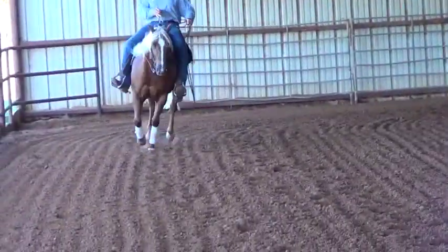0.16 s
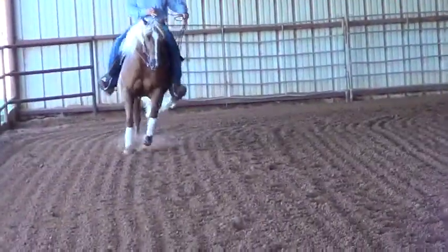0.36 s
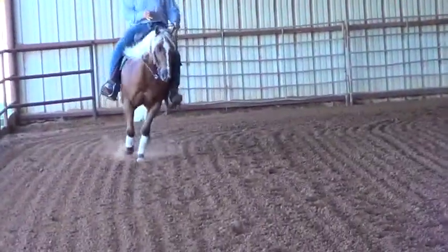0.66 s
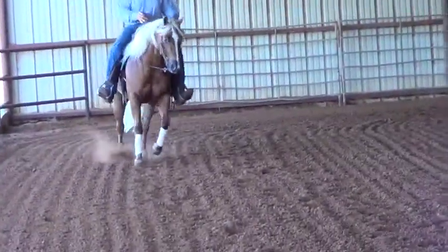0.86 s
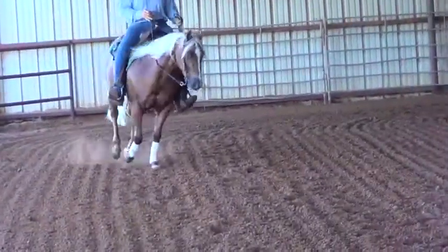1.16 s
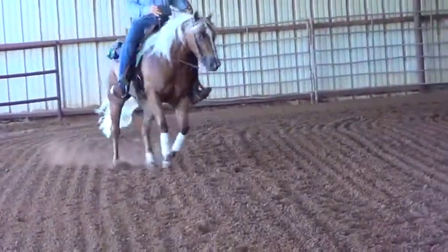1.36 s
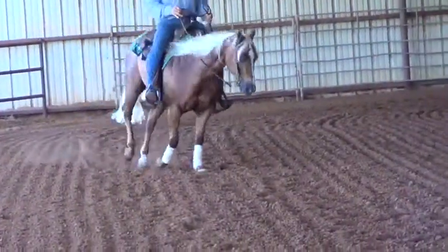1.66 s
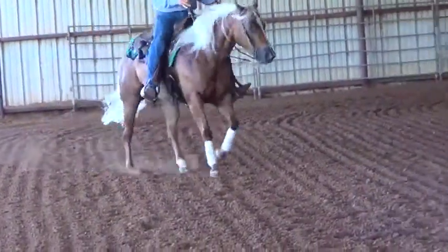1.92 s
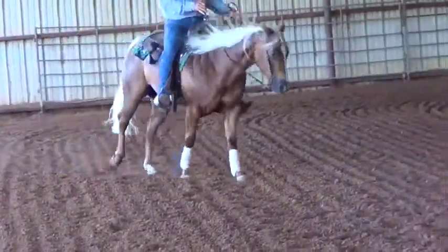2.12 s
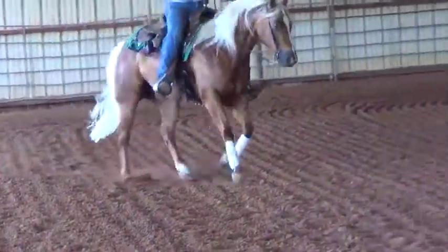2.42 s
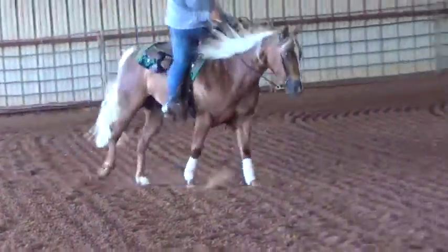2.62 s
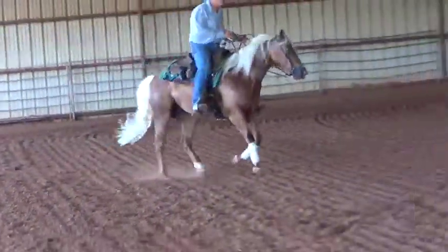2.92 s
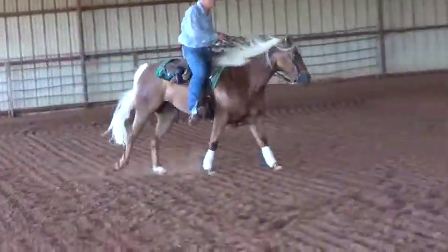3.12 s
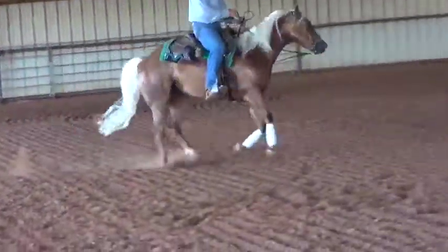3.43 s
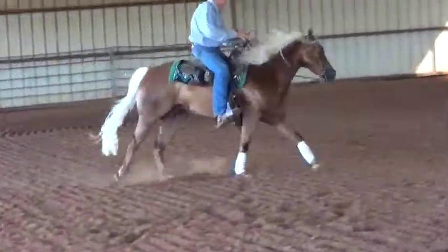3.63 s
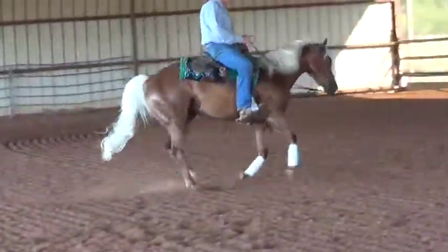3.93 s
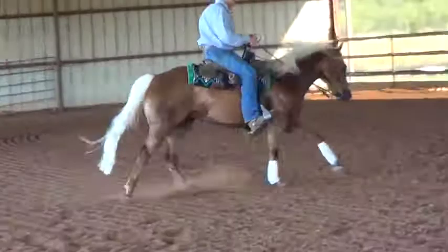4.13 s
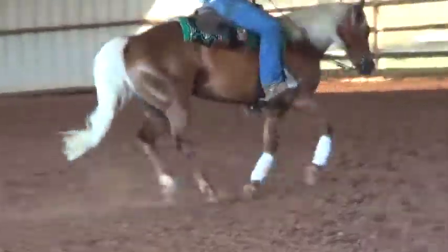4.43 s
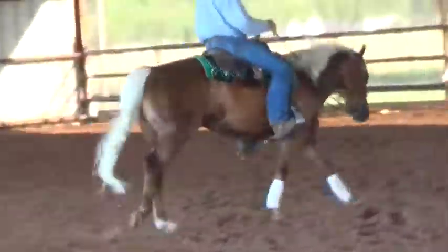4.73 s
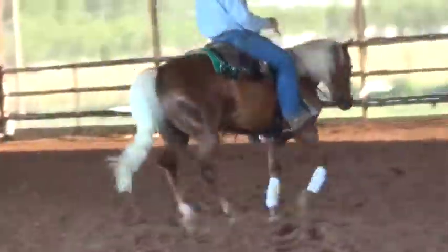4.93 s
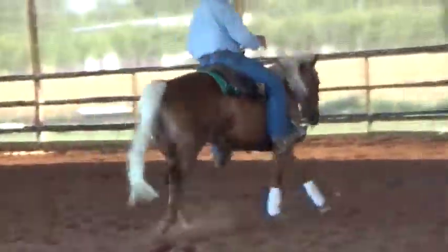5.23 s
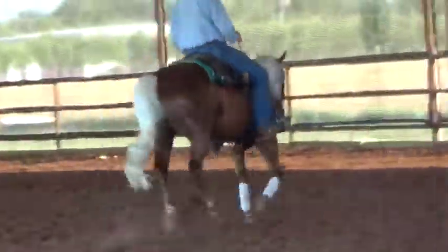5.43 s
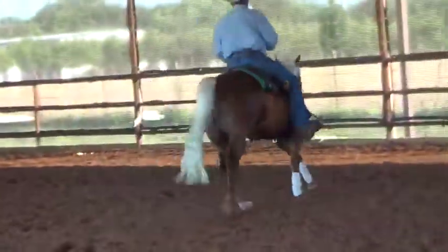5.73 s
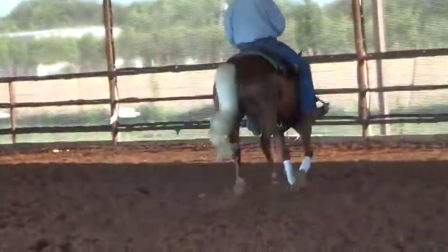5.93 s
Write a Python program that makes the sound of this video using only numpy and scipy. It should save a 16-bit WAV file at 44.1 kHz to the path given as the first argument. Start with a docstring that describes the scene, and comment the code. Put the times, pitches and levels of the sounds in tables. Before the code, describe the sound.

Faint dirt scuffs and a soft puff of wind on the microphone come first, then crunching hoof landings grow nearer, mixed with irregular pebble cracks, woody knocks and light metal jingles. One very loud double-edged clack stands out, another follows, then sparser, duller steps recede. The short hall tail is subtle; camera hiss, faint whining and scattered grit ticks continue around a few far bird notes.

```python
"""Arena under a roof, soft dirt floor: a horse lopes past a hand-held camera.
Hooves: sliding low thuds, and noise coloured as spraying sand and lumpy crunch.
Pebbles, hooves and tack: noise cracks with hollow knocks; a metal tack ring: decaying modes; grit: ticks.
Hall: a tail of random taps. Far birds: short gliding sines. Wind: one puff of lumpy low noise.
Beneath: hiss and rumble of camera and air as shaped noise, a beating whine, very high beating sines."""
import sys
import numpy as np
from scipy import signal
from scipy.fft import rfft, irfft
from scipy.io import wavfile
from scipy.ndimage import uniform_filter1d

SR = 44100
rng = np.random.default_rng(int(sys.argv[2]) if len(sys.argv) > 2 else 0)


def master_out(mix):
    """Clip the mix to full scale and print it as 16-bit PCM to the path in sys.argv[1]."""
    frames = np.transpose(np.atleast_2d(mix))
    ceiling = np.clip(frames, -1, 1)
    pcm = np.round(ceiling * 32767).astype(np.int16)
    wavfile.write(sys.argv[1], SR, pcm)


N = 267466

# hooves sliding in loose dirt: start_s, level_db (before the envelopes), hollow_hz (of the print)
SCUFFS = [(0.097, -35.5, 910), (0.272, -44, 900), (0.599, -40.5, 496), (0.82, -41, 1000),
          (1.122, -35, 1010), (1.159, -38, 990), (1.648, -28.5, 910), (1.695, -32, 925), (2.18, -30, 770),
          (2.219, -38, 405), (2.454, -35.5, 736), (2.539, -40.5, 402), (2.696, -30.5, 900),
          (2.717, -28, 765), (2.839, -36.5, 930), (2.969, -39.5, 764), (3.212, -34.5, 724),
          (3.239, -51, 756), (3.461, -42, 860), (3.758, -33, 392), (3.798, -40, 670), (3.993, -37.5, 603),
          (4.049, -47, 487), (4.259, -37, 600), (4.517, -44, 394), (4.613, -37.5, 907), (4.782, -32.5, 750),
          (4.81, -25, 576), (4.858, -38.5, 692), (4.92, -38, 637), (5.328, -36.5, 844), (5.849, -42, 820),
          (5.968, -42, 600)]
# dirt colour, relative: freq_hz, level_db
DIRT_COLOUR = [(70, -55), (200, 7), (400, -6), (600, -2.5), (800, -4), (1500, -0.5), (3000, -2),
               (5000, -5.5), (9000, -4), (12000, -8.5), (16000, -39)]
# hooves landing: start_s, peak_db, start_pitch_hz
THUDS = [(1.597, -29.5, 305), (2.106, -34, 177), (2.176, -31, 257), (2.723, -28, 187), (2.965, -33.5, 226),
         (3.47, -34, 192), (3.738, -26.5, 390), (4.719, -27, 216), (5.244, -28, 215)]
# pebbles, hooves, tack; peaks before port colour and pan:
# start_s, crack_peak_db, crack_centre_hz, knock_peak_db, knock_hz, pan_db (left over right)
CLACKS = [(0.82, -30, 4050, -47, 719, 0), (0.957, -28, 7500, -50, 905, 0), (1.166, -40, 3200, -27, 1620, 0),
          (1.694, -24, 3080, -18, 920, 0), (2.1827, -28, 3330, -29.5, 760, 0),
          (2.4573, -18, 9430, -24, 755, 2), (2.5457, -25, 3380, -44, 818, -2),
          (2.7162, -21, 4770, -35, 730, 4), (2.728, -34, 4700, -22, 1370, -13),
          (2.7484, -30, 3780, -15.5, 734, -3), (2.7705, -15, 3550, -17, 780, -5.5),
          (2.9676, -50, 5100, -15.5, 740, 2), (3.473, -21.5, 10100, -43, 891, 3),
          (3.7321, -11, 10000, -16, 1640, -1.5), (3.7408, -17, 6570, -17, 590, 4),
          (3.7563, -42, 6790, -18, 604, -2), (3.7968, -24, 7300, -28, 680, 0),
          (3.993, -23.5, 4100, -47, 554, 3), (4.04, -20, 10200, -46, 543, 1),
          (4.236, -19, 3520, -22, 1340, -15), (4.2385, -2.5, 5100, -8, 1240, -8.5),
          (4.2415, -4, 3650, -2.5, 1225, 4.5), (4.2443, -25, 3900, -11.5, 1050, -1),
          (4.2608, -34, 6920, -29, 610, 1), (4.6209, -39, 3440, -22.5, 830, 0),
          (4.779, -25.5, 9930, -56, 730, -8), (4.8103, -3.5, 4370, -20, 700, 1),
          (4.8168, -9.5, 4160, -18, 500, 0), (4.9521, -22.5, 4550, -35, 580, 3),
          (5.141, -30, 9400, -43, 580, 0), (5.6826, -15.5, 2640, -22.5, 797, -3.5),
          (5.6936, -28, 6240, -34, 1500, -2), (5.783, -30, 3580, -50, 800, 0)]
# blows on the tack ring: start_s, level_db, upper_modes_db (modes above 8 kHz against the lower)
JINGLES = [(0.0523, -35, 4), (0.5136, -25, -12), (0.818, -35, -2), (2.5735, -31, -4), (3.7328, -18.5, 3),
           (3.7388, -17, -7), (3.745, -43, -7), (3.8711, -38, 6), (4.2682, -32, 1), (4.7034, -34.5, -1)]
# modes of the ring: mode_hz, level_db, t60_s
RING_MODES = [(6700, -3.5, 0.064), (6930, -4, 0.022), (7010, -7, 0.1), (7120, -10, 0.032), (9290, -4, 0.05),
              (9430, -4.5, 0.046), (9860, -29, 0.027)]
# colour of sharp sounds at the ports: freq_hz, level_db
PORT_COLOUR = [(250, -11.5), (500, -2), (9000, 1.5), (11500, -5), (16000, -7)]
# housing resonances: centre_hz, width_hz, peak_db; users scale width or height
HOUSING = [(75.6, 15, 7), (797, 340, 4), (1500, 320, 4.5), (2180, 290, 4.5), (3580, 870, 3.5),
           (4950, 600, 6.5), (8730, 1430, 5.5)]
# hall decay: freq_hz, t60_s
HALL_DECAY = [(250, 1), (1000, 0.53), (4000, 0.22), (10000, 0.34)]
# far birds: start_s, length_s, from_hz, to_hz, peak_db
CHIRPS = [(.315, .04, 3730, 3750, -39), (1.979, .015, 4300, 3870, -35.5), (2.025, 0.046, 3200, 4200, -39),
          (2.291, .012, 3150, 2950, -38), (3.145, 0.026, 4350, 4250, -44), (3.7, 0.033, 4700, 4670, -36),
          (5.161, 0.081, 2720, 2340, -43)]
# wind on the microphone: time_s, level_db (before buffeting), centre_hz
GUST = [(.33, -56, 140), (.41, -42.5, 139), (.48, -34.5, 159), (.53, -35.5, 262), (.59, -31, 315),
        (.66, -41, 276), (.73, -52, 180), (.82, -58, 150)]
# air spectrum, relative: freq_hz, density_db_per_hz
AIR_COLOUR = [(15, -34), (30, -12.5), (60, -4), (120, -4), (450, -6.5), (900, -6), (1150, -10),
              (1900, -12.5), (3000, -14.5), (6300, -16.5), (9500, -17), (10500, -22), (14800, -22.5),
              (15300, -32), (16100, -39)]
# left-right likeness of the air at the ports: freq_hz, likeness (0 to 1)
LIKENESS = [(30, 0.85), (60, 0.98), (130, 0.98), (290, 0.61), (640, 0.4), (1410, 0.23), (3100, 0.59),
            (6820, 0.47), (9500, 0.67), (11000, 1), (16000, .999)]
# slow swell of the air: time_s, hiss_db, rumble_db
SWELL = [(0.0, -40, -43.5), (0.62, -38, -40), (0.98, -39, -44.5), (5.67, -38.5, -42.5), (6.06, -38, -40.5)]
# whine level: time_s, level_db
WHINE_LEVEL = [(0.0, -50), (1.79, -48), (5.59, -58.5), (6.06, -61)]
# whine pair, mean pitch: lower_hz, upper_hz
WHINE_HZ = [2078, 2095]
# three close, steady, very high tones that beat together: one pitch_hz each
WHISTLE_HZ = [15674.3, 15734.3, 15747.3]
# their levels, same order: one rms_db each
WHISTLE_RMS_DB = [-67, -52, -57]

# deeper prints trickle longer: t60 goes as (PRINT_HZ / hollow_hz) ** LINGER_POWER
PRINT_HZ, SCUFF_T60_S, LINGER_POWER = 710, 0.29, 1
# boom of a print at PRINT_HZ, and how much more per octave deeper
LIFT_DB, LIFT_DB_PER_OCTAVE = 10, 12.5
# dirt sounds brighter while the horse passes close
PASS_S, PASS_WIDTH_S = 4.2, 0.73
NEAR_TILT_DB_PER_OCTAVE, FAR_TILT_DB_PER_OCTAVE = 0.7, -2
THUD_T60_S = 0.043
# t60 of a crack at MIDDLE_DB; harder blows are snappier, by a log factor per dB
CRACK_T60_S, SHORTER_PER_DB, MIDDLE_DB = 0.021, 0.13, -16
JINGLE_PAN_DB = 6.5
TICKS_PER_S, TICK_FLOOR_DB = 10, -39
BAND_EDGE_HZ = 16100


def gain_of(db):
    """Decibels to amplitude factor."""
    return 10 ** (np.asarray(db) / 20)


def evened(x):
    """Scales to rms 1."""
    return x / np.sqrt(np.mean(x ** 2) + 1e-20)


def peaked(x, db):
    """Scales to a peak level."""
    return gain_of(db) * x / (np.max(abs(x)) + 1e-12)


def smoothed(x, first, second):
    """Two moving averages along time, lengths in samples."""
    return uniform_filter1d(uniform_filter1d(x, first), second)


def read(points, hz):
    """Reads a spectrum on a log-frequency axis."""
    f, value = np.transpose(points)
    return np.interp(np.log(hz + 1), np.log(f + 1), value)


def curve(rows):
    """Spreads curve rows over all samples."""
    s, *columns = np.transpose(rows)
    return [np.interp(np.arange(N) / SR, s, c) for c in columns]


def add(mix, start_s, sound, pan_db=0):
    """Places a sound in the stereo mix."""
    part = mix[:, max(round(start_s * SR), 0):][:, :sound.shape[-1]]
    part += sound[..., :part.shape[1]] * gain_of([[pan_db / 2], [-pan_db / 2]])


def resonate(x, hz, width_hz):
    """Resonance of gain 1: shifts hz down to zero, smooths, shifts back."""
    turn = np.exp(2j * np.pi * np.cumsum(hz * np.ones(len(x))) / SR)
    r = np.exp(-np.pi * width_hz / SR)
    return 2 * (turn * signal.lfilter([1 - r], [1, -r], x / turn)).real


def bell(hz, centre_hz, width_hz):
    """Resonance bump of height 1."""
    return 1 / (1 + (2 * (hz - centre_hz) / width_hz) ** 2)


def housing_db(hz):
    """Sum of the housing resonances in dB."""
    return sum(db * bell(hz, f, w) for f, w, db in HOUSING)


def clumpy_decay(t, rise_s, t60_s, noise, clump_db):
    """Smooth rise, exponential decay, random level clumps."""
    rise = np.sin(np.pi / 2 * np.minimum(t / rise_s, 1)) ** 2
    decay = gain_of(-60 * np.maximum(t - rise_s, 0) / max(t60_s, .02))
    return rise * decay * gain_of(clump_db * evened(smoothed(noise, 90, 40)))


def scuffs():
    """Fine sand sprays first and dies fast; heavier crunch swells after it and lingers."""
    out, t = np.zeros((2, N)), np.arange(12000) / SR
    hz = np.fft.rfftfreq(len(t), 1 / SR)
    noise = rng.standard_normal((len(SCUFFS), 5, len(t)))
    fine = 1 / (1 + (2600 / (hz + 1)) ** 4)
    tilt_octaves = np.log2(np.maximum(hz, 600) / 2000)
    for (s, db, hollow_hz), (common, left, right, *clumps) in zip(SCUFFS, noise):
        t60_s = SCUFF_T60_S * (PRINT_HZ / hollow_hz) ** LINGER_POWER
        nearness = np.exp(-((s - PASS_S) / PASS_WIDTH_S) ** 2)
        tilt = FAR_TILT_DB_PER_OCTAVE + (NEAR_TILT_DB_PER_OCTAVE - FAR_TILT_DB_PER_OCTAVE) * nearness
        lift_db = LIFT_DB + LIFT_DB_PER_OCTAVE * np.log2(PRINT_HZ / hollow_hz)
        hollow_db = lift_db * bell(hz, hollow_hz, 0.4 * hollow_hz)
        colour_db = read(DIRT_COLOUR, hz) + tilt * tilt_octaves + hollow_db + 0.67 * housing_db(hz)
        stereo = common + 0.23 * np.array([left, right])
        sand = rfft(evened(irfft(rfft(stereo) * gain_of(colour_db), len(t))))
        spray = irfft(sand * fine, len(t)) * clumpy_decay(t, 0.011, 0.89 * t60_s, clumps[0], 0.99)
        crunch = irfft(sand * (1 - fine), len(t)) * clumpy_decay(t, 0.022, t60_s, clumps[1], 2.4)
        add(out, s - .009, gain_of(db) * (spray + crunch))
    return out


def thuds():
    """Packed dirt answers each hoof with soft low cycles that slide down; the octave dies faster."""
    out, t = np.zeros((2, N)), np.arange(6000) / SR
    shape = np.minimum(t / 0.0092, 1) * gain_of(-60 * t / THUD_T60_S)
    for s, db, hz in THUDS:
        phase = 2 * np.pi * hz * t * (1 - 1.35 * t)
        thud = shape * (np.sin(phase) + 0.66 * shape * np.sin(2 * phase))
        add(out, s - .004, peaked(thud, db))
    return out


def clacks():
    """Hard contact: a short noise crack round its centre, with a hollow knock ringing a few cycles."""
    out, t = np.zeros((2, N)), np.arange(3000) / SR
    noise = rng.standard_normal((len(CLACKS), 2, len(t)))
    for (s, db, hz, knock_db, knock_hz, pan_db), (a, b) in zip(CLACKS, noise):
        t60_s = CRACK_T60_S * np.exp(-SHORTER_PER_DB * (db - MIDDLE_DB))
        burst = a * gain_of(-60 * t / t60_s) * np.minimum(t / 0.0021, 1)
        crack = resonate(resonate(burst, hz, 1460), hz, 9000)
        crack = crack + 0.18 * sum(resonate(burst, f, 3 * w) for f, w, _ in HOUSING[2:])  # housing answers
        blow = b * gain_of(-60 * t / 0.012) * np.minimum(t / 0.0019, 1)
        knock = resonate(resonate(blow, knock_hz, 130), knock_hz, 560)
        # neighbouring modes
        knock = knock + 0.24 * resonate(blow, 0.58 * knock_hz, 107)
        knock = knock + 0.23 * resonate(blow, 1.33 * knock_hz, 240)
        add(out, s - .0005, peaked(crack, db) + peaked(knock, knock_db), pan_db)
    grid_hz = np.linspace(0, SR / 2, 129)
    # doubled dB: minimum_phase takes the square root of the magnitude
    linear = signal.firwin2(257, grid_hz, gain_of(2 * read(PORT_COLOUR, grid_hz)), fs=SR)
    return signal.lfilter(signal.minimum_phase(linear), 1, out)


def jingles():
    """Every blow rings the same small metal modes, with chance phases."""
    out, t = np.zeros((2, N)), np.arange(6000) / SR
    phase_turns = rng.random((len(JINGLES), len(RING_MODES)))
    for (s, db, upper_db), row in zip(JINGLES, phase_turns):
        ring = np.zeros(len(t))
        for (hz, mode_db, t60_s), turn in zip(RING_MODES, row):
            decay = gain_of(mode_db + upper_db * (hz > 8000) - 60 * t / t60_s)
            ring += decay * np.sin(2 * np.pi * (hz * t + turn))
        add(out, s, gain_of(db) * ring * np.minimum(t / 0.00068, 1), JINGLE_PAN_DB)
    return out


def grit():
    """Grit flung up at random: sparse bright decaying ticks of uneven size."""
    struck = rng.random(N) < TICKS_PER_S / SR
    size = gain_of(TICK_FLOOR_DB + 6.0 * np.minimum(rng.exponential(1, N), 1.8)) * struck
    kind, t, out = rng.integers(0, 6, N), np.arange(300) / SR, np.zeros((2, N))
    for k, hz in enumerate([3900, 7000, 8240, 9100, 10440, 11300]):
        tick = gain_of(-60 * t / 0.0077) * np.sin(2 * np.pi * hz * t)
        out += signal.oaconvolve(size * (kind == k), tick)[:N]
    return out


def hall(x):
    """Roof and walls: taps of random sign, each band dying at its own speed."""
    taps = np.zeros((2, SR // 2))
    at = np.arange(300, SR // 2 - 20, 20)
    at = at + rng.integers(0, 20, (2, len(at)))
    np.put_along_axis(taps, at, rng.choice([-1., 1.], at.shape), 1)
    hz, t, z = signal.stft(taps, SR, nperseg=256)
    decay = gain_of(-60 * t / read(HALL_DECAY, hz)[:, None])
    tail = signal.istft(z * decay, SR, nperseg=256)[1]
    return signal.fftconvolve(x.mean(0)[None], tail / np.linalg.norm(tail[0]), axes=1)[:, :N]


def birds():
    """Short sine notes, each gliding linearly under a smooth swell."""
    out = np.zeros((2, N))
    for s, length_s, from_hz, to_hz, db in CHIRPS:
        hz = np.linspace(from_hz, to_hz, round(length_s * SR))
        add(out, s, gain_of(db) * np.hanning(len(hz)) * np.sin(2 * np.pi * np.cumsum(hz) / SR))
    return out


def gust():
    """Wind on the microphone: lumpy low noise, partly different at each port."""
    db, centre_hz = curve(GUST)
    t = np.arange(N) / SR
    blowing = uniform_filter1d(1. * (t > GUST[0][0]) * (t < GUST[-1][0]), 2000)
    common, *own = rng.standard_normal((3, N))
    lumps = [evened(resonate(resonate(common + 0.13 * n, centre_hz, 174), centre_hz, 560)) for n in own]
    buffets = evened(smoothed(rng.standard_normal(N), 900, 500))
    return gain_of(db + 1.7 * buffets) * blowing * np.array(lumps)


def air():
    """Hiss and rumble: shaped noise with faint patches in time and frequency, part common to both ports."""
    frames, hz = N // 512 + 5, np.fft.rfftfreq(2048, 1 / SR)
    a, b, c, d, patches = rng.standard_normal((frames, 1025, 5)).T
    patches = evened(uniform_filter1d(uniform_filter1d(patches, 28, 0), 4, 1))
    colour_db = read(AIR_COLOUR, hz) + housing_db(hz)
    apart = np.sqrt((1 - np.clip(read(LIKENESS, hz), 0, 1)[:, None]) / 2)
    mid, side = np.sqrt(1 - apart ** 2) * (a + 1j * b), apart * (c + 1j * d)
    z = np.array([mid + side, mid - side]) * gain_of(colour_db[:, None] + 1.48 * patches)
    low = 1 / (1 + (hz[:, None] / 350) ** 4)
    hiss, rumble = (evened(signal.istft(z * band, nperseg=2048, noverlap=1536)[1][:, :N])
                    for band in (1 - low, low))
    hiss_db, rumble_db = curve(SWELL)
    return gain_of(hiss_db) * hiss + gain_of(rumble_db) * rumble


def tones():
    """Camera whine: two drifting tones beat in a fuzzy band; three steady, very high tones beat together."""
    noise, t = rng.standard_normal((3, N)), np.arange(N) / SR
    drifts = [evened(smoothed(n, 4000, 4000)) for n in noise[:2]]
    lower, upper = (np.sin(2 * np.pi * np.cumsum(hz + 2.49 * drift) / SR)
                    for hz, drift in zip(WHINE_HZ, drifts))
    centre_hz = np.mean(WHINE_HZ)
    fuzz = evened(resonate(resonate(noise[2], centre_hz, 80), centre_hz, 80))
    # the pair is summed before the fuzz joins at its own level
    whine = evened(lower + .6 * upper + 0.6 * fuzz)
    whistle = sum(np.sqrt(2) * gain_of(db) * np.sin(2 * np.pi * hz * t)
                  for hz, db in zip(WHISTLE_HZ, WHISTLE_RMS_DB))
    return gain_of(curve(WHINE_LEVEL)[0]) * whine + whistle


def scene():
    """Horse and birds, with their hall tail, over wind, air and tones."""
    in_hall = scuffs() + thuds() + clacks() + jingles() + grit() + birds()
    return in_hall + gain_of(-18.5) * hall(in_hall) + gust() + air() + tones()


def record(dry):
    """Close ports share bass and top; gain control ducks loud sounds; peaks round off; band limit."""
    mid, side = (dry[0] + dry[1]) / 2, (dry[0] - dry[1]) / 2
    side = signal.sosfilt(signal.butter(2, [70, 11000], "band", fs=SR, output="sos"), side)
    # gain control: instant hold, linear recovery in dB
    power_db = 10 * np.log10(abs(uniform_filter1d(mid ** 2, 200)) + 1e-12)
    over_db = 0.36 * np.maximum(power_db + 18, 0)
    recovered_db = np.arange(N) * 1.78 / SR  # 1.78 dB a second
    held_db = np.maximum(np.maximum.accumulate(over_db + recovered_db) - recovered_db, 0)
    lag = np.exp(-1 / (0.01 * SR))  # 10 ms lag: the dip trails the attack
    duck_db = signal.lfilter([1 - lag], [1, -lag], held_db)
    ducked = np.array([mid + side, mid - side]) / gain_of(duck_db)
    size = abs(ducked)
    bent = np.sign(ducked) * (.5 + .42 * np.tanh((size - .5) / .42))
    rounded = np.where(size < .5, ducked, bent)
    band_limit = signal.firwin(1023, BAND_EDGE_HZ, window=("kaiser", 9), fs=SR)
    return signal.oaconvolve(rounded, band_limit[None], "same")


dry = scene()
out = record(dry)
master_out(out)
```